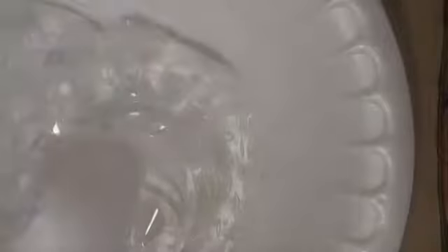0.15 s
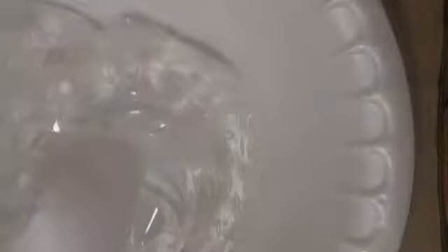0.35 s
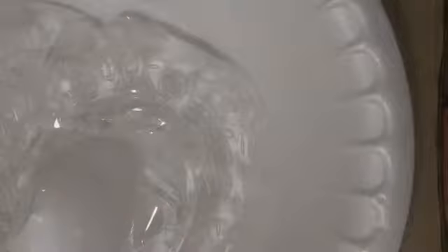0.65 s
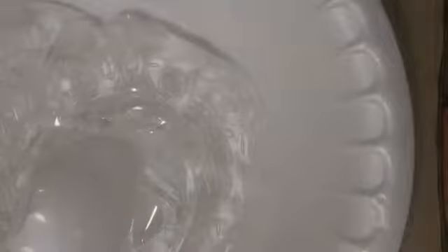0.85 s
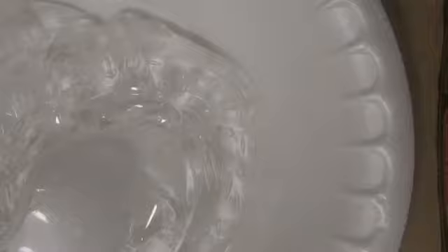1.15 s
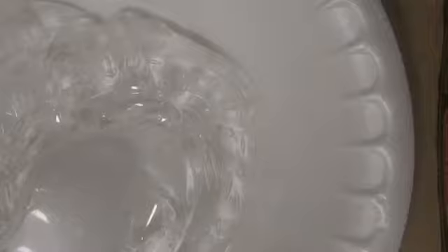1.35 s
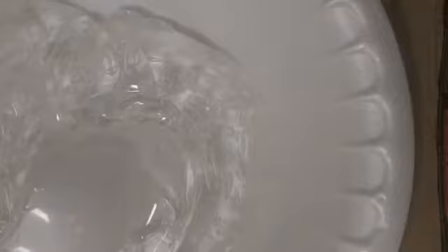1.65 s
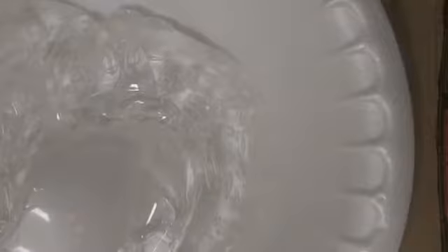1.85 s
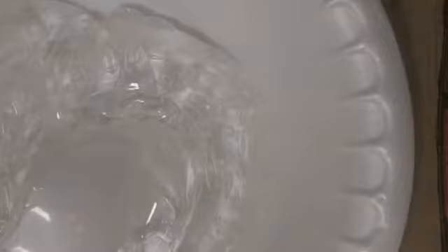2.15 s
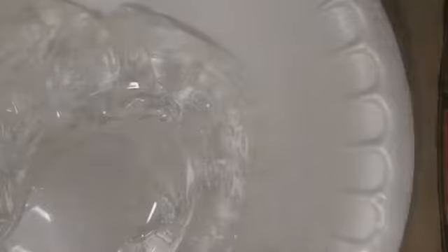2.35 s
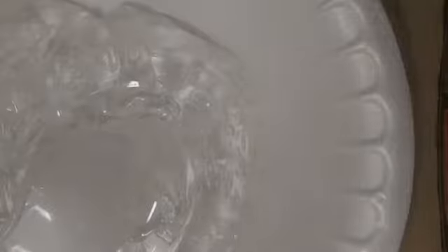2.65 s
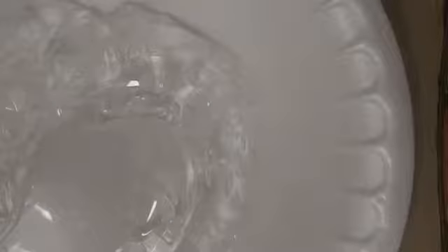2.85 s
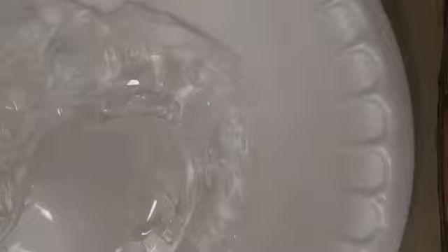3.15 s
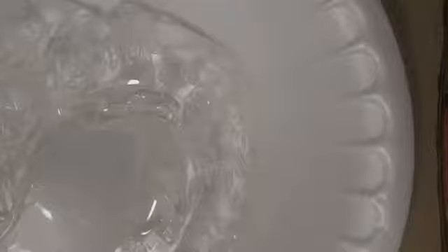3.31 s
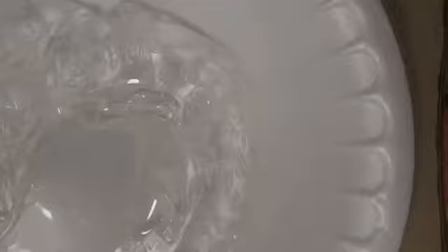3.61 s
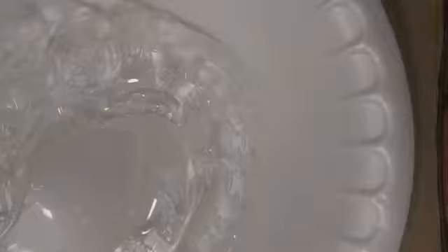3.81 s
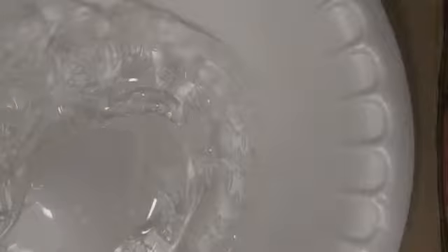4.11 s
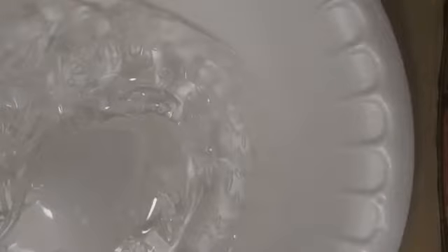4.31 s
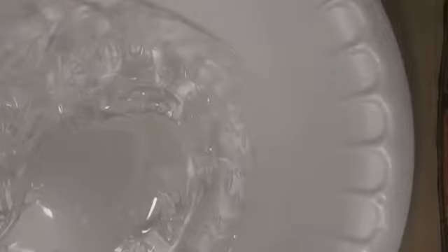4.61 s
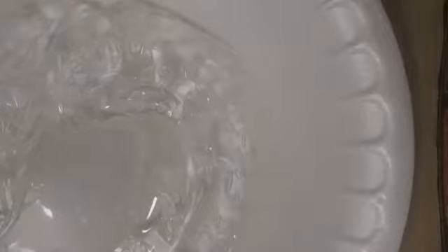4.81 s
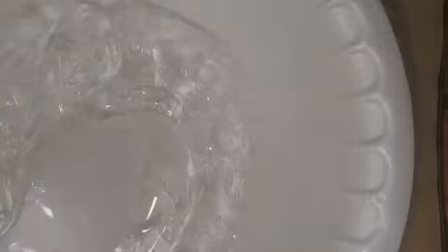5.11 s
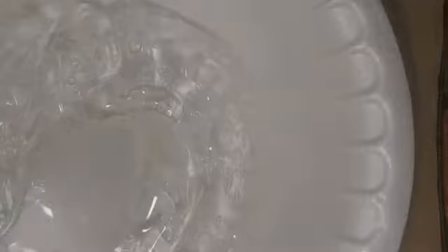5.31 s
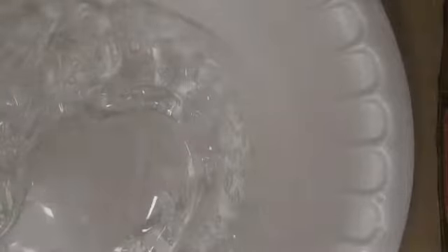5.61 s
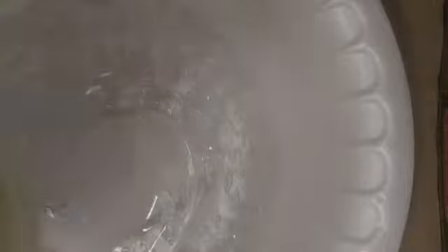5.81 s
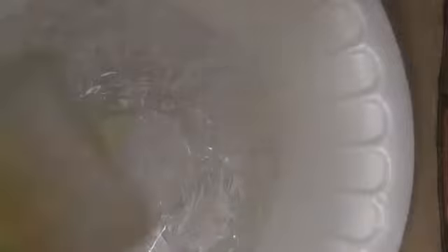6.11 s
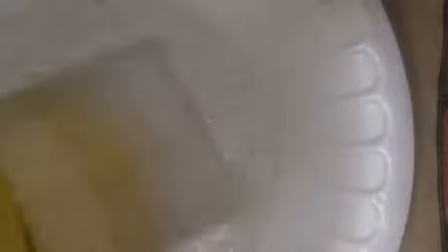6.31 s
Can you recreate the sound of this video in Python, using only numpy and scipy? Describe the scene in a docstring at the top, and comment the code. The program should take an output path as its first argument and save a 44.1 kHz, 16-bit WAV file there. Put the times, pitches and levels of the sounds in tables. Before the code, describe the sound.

A spatula works slowly through thick gel in a plastic cup, with soft smears, sticky crackles and small pops over a fan's hum.

```python
"""A small room, the microphone close to a plastic cup in which a spatula works slowly through thick gloss.
With each push the gel smears with a soft hiss and crackles as sticky threads let go. Early on it
squelches through the gap under the blade, and a few air pockets pop. Now and then the blade brushes
the wall or knocks the cup, which rings briefly. Behind the cup, a fan rushes and hums."""
import sys
import numpy as np
from scipy import signal
from scipy.fft import rfft, irfft
from scipy.io import wavfile
from scipy.ndimage import map_coordinates

SR = 44100
rng = np.random.default_rng(int(sys.argv[2]) if len(sys.argv) > 2 else 0)


def to_wav(sig):
    """Store sig (one row per channel, or 1-D mono) as 16-bit WAV at the path in sys.argv[1].

    Samples outside -1..1 are clipped; the rate is SR.
    """
    pcm = np.clip(np.atleast_2d(sig), -1, 1) * 32767
    pcm = np.round(pcm).astype(np.int16)
    wavfile.write(sys.argv[1], SR, pcm.T)  # frames by channels


N = 284886
TIME = np.arange(N) / SR

# pushes of the blade: (fastest moment [s], swell [s], fade [s], relative level [dB], rasp offset [dB])
PUSHES = [(.03, 0.12, 0.27, -58.5, -6), (.245, 0.35, 0.26, -48.5, -6), (.56, 0.19, 1, -49.5, -4.5),
          (0.712, 0.069, 0.11, -45.5, -8), (.83, 0.056, 0.095, -51, -3), (.874, 0.061, 0.048, -46, -10),
          (.93, .05, 0.082, -56, -4.5), (1.125, 0.21, 0.13, -58.5, 0), (1.257, 0.013, 0.089, -55, 0),
          (1.34, 0.11, 0.29, -55, -7.5), (1.417, 0.023, 0.024, -42, -7), (1.55, 0.18, 0.13, -50, -8),
          (1.64, 0.071, 0.13, -49.5, -9), (1.717, 0.039, 0.043, -44, -8.5), (1.87, 0.25, 0.76, -52.5, -8.5),
          (2.025, 0.05, 0.056, -49, -6), (2.265, 0.11, 0.18, -51.5, 0), (2.41, 0.072, 0.19, -62, -0.5),
          (2.84, 0.19, 0.29, -65, 1.5), (3.037, 0.0099, 0.018, -41, -1.5),
          (3.165, 0.092, 0.17, -61.5, -1.5), (3.355, 0.091, 0.076, -59, 0.5), (3.45, 0.11, 0.12, -58.5, 0),
          (3.57, 0.043, 0.11, -61, -1), (4.26, 0.3, 0.23, -63, -1.5), (4.37, 0.043, 0.055, -62, 1),
          (4.54, 0.16, 0.2, -49, -6), (4.8, 0.17, 0.15, -65.5, -6), (4.96, 0.054, 0.62, -65.5, -0.5),
          (5.146, 0.01, 0.05, -63, -17), (5.372, 0.04, 0.3, -57.5, -6), (5.5, 0.14, 0.25, -64, 0.5)]
# how readily the gel tears: (time [s], share of the smear that is grains [0-1])
TACKINESS = [(0, 0.25), (.5, 0.24), (.72, 0.2), (1.0, 0.18), (1.9, 0.37), (2.25, 0.47), (3.2, 0.2),
             (4.35, 0.7), (4.52, 0.5), (5.4, 0.25), (6.4, 0.3)]
# spectrum of the smear's hiss: (frequency [Hz], relative density [dB])
HISS_SPECTRUM = [(500, -42), (1500, -25), (3000, -48), (6000, -2.5), (8500, 6), (11000, 6.5), (12500, 7.5),
                 (14000, 9)]
# spectrum of the rasp under pressure: (frequency [Hz], relative density [dB])
RASP_SPECTRUM = [(300, -22), (700, 9.5), (1100, 2.5), (1650, -0.5), (2700, 0), (3700, 0), (5200, 1),
                 (7500, 0), (12000, -68)]
# the larger threads snapping: (time [s], relative level [dB], brightness [dB])
THREAD_SNAPS = [(0.684, -40.5, -18), (0.856, -42, -10), (0.869, -46, -6), (0.933, -50, -15),
                (1.3465, -41, -7), (1.417, -35, -26), (1.4222, -33, 4), (2.1811, -40.5, -21),
                (2.2155, -39.5, -21.5), (2.2454, -33.5, -8), (2.2635, -43.5, -18.5), (2.274, -42, -19),
                (2.281, -38.5, -15), (2.3228, -40, -19.5), (2.3319, -40.5, -13), (2.4968, -45, -20),
                (2.508, -45, -21), (2.7892, -46, -20.5), (2.8163, -44.5, -17), (2.9141, -43.5, -17),
                (3.034, -36, -22), (3.041, -44, -12), (3.048, -42, -22), (3.0792, -37.5, -15),
                (3.093, -43, -18), (3.118, -49, -16), (3.1257, -46, -13), (3.153, -46, -20),
                (3.159, -44, -20), (3.165, -38.5, -15), (3.1784, -35.5, -16), (3.206, -40.5, 0),
                (3.2427, -46, -7), (3.3098, -42, -5), (3.3325, -37.5, -10.5), (3.3532, -42, -23),
                (3.358, -45.5, -13), (3.364, -44, -12), (3.459, -39, -18), (3.519, -54, -12),
                (3.558, -43.5, -16), (3.563, -42, -16), (3.5692, -43, -17), (3.577, -45, -13),
                (3.5986, -51, -23), (3.6592, -48, -19), (3.976, -48.5, -19), (3.986, -48.5, -20),
                (4.1782, -47, -18), (4.1844, -45, -21), (4.231, -38, -6), (4.2393, -36.5, -16.5),
                (4.272, -46, -14), (4.276, -43.5, -23), (4.2964, -42.5, -14), (4.3222, -42.5, -19.5),
                (4.3398, -41, -17), (4.347, -40.5, -22.5), (4.3647, -42, -22), (4.371, -43, -22),
                (4.377, -44, -18), (4.3952, -45, -13), (4.429, -47, -19), (4.4422, -40.5, -15),
                (4.587, -38.5, -25), (4.6542, -47.5, -23), (4.9328, -45.5, -16), (5.137, -34, -16.5),
                (5.1713, -51.5, -30), (5.198, -46, -24), (6.417, -52, 8)]
# spectrum of a snap: (frequency [Hz], relative density [dB])
SNAP_SPECTRUM = [(300, -23), (900, -7), (1700, -5.5), (2800, -9.5), (5000, -4), (8500, 4), (11000, 2.5),
                 (14000, 3)]
# the blade peeling off the wall: (start [s], end [s], fine snaps [1/s])
BLADE_PEELS = [(2.198, 2.344, 40), (2.759, 2.86, 20), (3.056, 3.28, 60), (3.315, 3.387, 70),
               (3.459, 3.534, 30), (4.306, 4.5, 70)]
# air pockets opening: (time [s], level [dB], pitch [Hz], t60 [s])
AIR_POCKETS = [(.548, -36, 980, 0.019), (0.552, -42, 1710, 0.03), (.558, -37, 920, 0.038),
               (1.095, -28, 2100, 0.0035), (1.124, -34, 2150, 0.008), (1.1305, -33, 2450, 0.011),
               (1.1375, -34, 2000, 0.008), (1.1415, -31, 2350, 0.0067), (1.148, -34, 2060, 0.0099),
               (1.152, -32, 2370, 0.012), (1.186, -18, 2070, 0.012), (1.193, -24.5, 2070, 0.011),
               (1.1986, -30, 1920, 0.02), (6.345, -47.5, 5330, 0.0094), (6.403, -46.5, 5400, 0.0083)]
# gel squeezed under the blade: (start [s], rise [s], level [dB], fade [dB/s], gap pitch [factor])
GEL_SQUEEZES = [(.17, 0.073, -54.5, 78, 1.08), (0.432, 0.019, -46.5, 120, 1.03),
                (.543, 0.013, -69, 300, 0.49)]
# resonances of the gap under the blade: (base frequency [Hz], width [Hz], gain [dB])
GAP_RESONANCES = [(1244, 106, 7.5), (1534, 200, 8.5), (2680, 270, -2), (3100, 420, -1), (4250, 270, -6),
                  (4700, 270, -0.5), (6860, 350, -4.5), (12370, 260, 5.5), (13100, 800, -1)]
# the blade meeting the cup: (time [s], relative level of the first 10 ms [dB], centre of the blow [Hz],
# contact [s], ring time left by the pressing blade [share], breadth of the blow [octaves])
CUP_KNOCKS = [(0.1416, -45.5, 1710, 0.00081, 0.8, 0.93), (0.1415, -39, 255, 0.0011, 0.71, 0.46),
              (.1485, -49, 1200, 0.002, 0.9, 1), (1.0952, -47.5, 796, 0.0005, 0.2, 1.3),
              (1.411, -47.5, 474, 0.0059, 0.67, 1), (1.417, -47.5, 1490, 0.0019, 0.61, 0.43),
              (1.419, -45, 300, 0.014, 0.56, 0.49), (3.0324, -34.5, 880, 0.0012, 1, 0.5),
              (3.034, -46.5, 1450, 0.002, 1, 0.25), (3.0397, -42, 1000, 0.0012, 0.65, 0.39),
              (3.0403, -39.5, 483, 0.00082, 0.43, 0.38), (3.047, -41.5, 730, 0.0012, 0.56, 0.73),
              (3.067, -55, 750, 0.0017, 0.55, 0.6), (3.076, -51, 850, 0.002, 0.67, 0.41),
              (4.5135, -47.5, 1190, 0.0029, 0.84, 1), (4.589, -45, 1150, 0.01, 0.83, 1.0)]
# modes of the cup: (frequency [Hz], gain [dB], free t60 [s])
CUP_MODES = [(276.4, 11, 0.12), (469, 15, 0.076), (624, 14.5, 0.047), (738, 9, 0.066), (859, 7.5, 0.055),
             (1020, 8.5, 0.052), (1320, 3.5, 0.058), (1456, 5, 0.027), (1930, 0, 0.035), (2450, 5, 0.008)]
# the blade's edge brushing the wall: (time [s], level [dB], fade [s])
EDGE_BRUSHES = [(.683, -50, 0.036), (.712, -47.5, 0.023), (.795, -60, 0.052), (.856, -42, 0.0092),
                (0.872, -45.5, 0.013)]
# resonances of the blade: (base frequency [Hz], width [Hz], gain [dB])
BLADE_RESONANCES = [(2180, 790, -4.5), (3850, 590, 2), (5730, 1200, 0.5), (7500, 1000, -0.5)]
# spectrum of the fan's rush: (frequency [Hz], relative density [dB])
FAN_SPECTRUM = [(20, -41.5), (110, -36.5), (165, -27.5), (205, -14), (255, -9), (330, -6), (480, -4),
                (570, -10.5), (750, -15.5), (1100, -25), (1900, -24.5), (2600, -32.5), (6000, -38),
                (10000, -43.5), (14000, -42.5)]
# resonances and notches of the fan's duct: (frequency [Hz], width [Hz], gain [dB])
DUCT_RESONANCES = [(349, 18, -3), (408.4, 35, 9), (429.3, 7.7, 3), (445.7, 8.5, -1.5), (590, 23, -3.5),
                   (636, 18, 4), (880, 13, 2.5), (1493, 110, 4.5), (3070, 500, 5)]
# tones of the fan's motor: (frequency [Hz], rms level [dB])
MOTOR_TONES = [(360.5, -57), (430.7, -71.5), (1034, -78), (1168, -78.5), (1260, -82), (3106, -80),
               (3623, -83.5), (4140, -88.5)]


def smear(hiss_db=-1.5, rasp_db=-2.5, grains_per_s=1400, spread_db=3.5, judder_db=1.6, grain_s=0.00075):
    """Close up, fine hiss and tiny tearing grains under the blade; pressure brings out a lower rasp."""
    hiss_level, rasp_level = push_levels()
    tack = np.clip(np.interp(TIME, *np.transpose(TACKINESS)), 0, 1)
    sizes = amp(spread_db * np.minimum(rng.exponential(1, N), 4))
    tears = sizes * (rng.random(N) < grains_per_s / SR)
    grains = unit(signal.lfilter([1], [1, -np.exp(-1 / (grain_s * SR))], tears))
    grit = np.sqrt(1 - tack + tack * grains ** 2)  # steady wiping plus separate grains
    hiss = unit(colour(grit * rng.standard_normal(N), lambda hz: spectrum_db(HISS_SPECTRUM, hz)))
    rasp = unit(colour(grit * rng.standard_normal(N), lambda hz: spectrum_db(RASP_SPECTRUM, hz)))
    judder = amp(judder_db * wander(66))
    return judder * (amp(hiss_db) * hiss_level * hiss + amp(rasp_db) * rasp_level * rasp)


def push_levels(drop_db=31, swell_bend=2.02, fade_bend=1.4, creep_db=-69, creep_db_per_s=-1.5):
    """Envelopes of hiss and rasp: each push swells and fades over the slow creep of the settling gel."""
    hiss_power = rasp_power = amp(creep_db + creep_db_per_s * TIME) ** 2
    for s, swell_s, fade_s, db, pressure_db in PUSHES:
        before = np.maximum((s - TIME) / swell_s, 0) ** swell_bend
        after = np.maximum((TIME - s) / fade_s, 0) ** fade_bend
        power = amp(db - drop_db * np.minimum(before + after, 10)) ** 2
        hiss_power = hiss_power + power
        rasp_power = rasp_power + power * amp(pressure_db) ** 2
    return np.sqrt(hiss_power), np.sqrt(rasp_power)


def snaps(gain_db=-4.0, rise_s=0.00073, fizz_s=0.024, strand_db=-11.5, strands_s=0.013,
          neutral_db=-14.0, hollow_hz=1800, hollow_t60=0.048):
    """A thread parts in a sharp burst and blips the hollow behind it; its last strands fizz after."""
    out, t = np.zeros(N), np.arange(2 ** 11) / SR
    fizz = amp(-15) * np.exp(-t / fizz_s)
    def burst(after_s):
        age = np.maximum(t - after_s, 0) / rise_s
        return age * np.exp(1 - age)
    for s, db, bright_db in THREAD_SNAPS + fine_threads():
        tilt_db = bright_db - neutral_db
        def shape(hz):
            octaves = np.clip(np.log2((hz + 1) / 6000), -1, 1)
            return spectrum_db(SNAP_SPECTRUM, hz) + 0.96 * tilt_db * octaves
        strands = sum(burst(strands_s * late) ** 2 for late in rng.random(size=2))
        level = np.sqrt((burst(0) + fizz) ** 2 + amp(strand_db) ** 2 * strands)
        crack = level * unit(colour(rng.standard_normal(len(t)), shape))
        hollow_db = -14 - 0.21 * tilt_db  # thick, dull threads open larger hollows
        hollow = resonate(rng.standard_normal(len(t)), hollow_hz * rng.uniform(0.84, 1.05), width_hz=800)
        blip = amp(hollow_db - 60 * t / hollow_t60) * unit(hollow)
        add(out, s, amp(db + gain_db) * (crack + blip))
    return out


def fine_threads():
    """Fine threads let go at random in each peel: (time [s], relative level [dB], brightness [dB])."""
    rows = []
    for start, end, per_s in BLADE_PEELS:
        count = round((end - start) * per_s)
        for when, softness, tone in rng.random(size=(40, 3))[:count]:
            rows.append((start + (end - start) * when, -51.5 - 2 * softness, -25 + 10 * tone))
    return rows


def pops(rise_s=0.0018, sag=0.02, wobble=0.046, spit_db=-9.5, spit_s=0.003, spit_octaves=0.32,
         spray_db=-31.0, spray_hz=5700, spray_s=0.005):
    """Air pockets open with a spit and a faint spray, then ring briefly, wobbling with their soft walls."""
    out, t = np.zeros(N), np.arange(2 ** 11) / SR
    for s, db, hz, t60 in AIR_POCKETS:
        pitch_hz = hz * (1 - sag * np.minimum(t / t60, 1) + wobble * wander(500, len(t)))
        ring = amp(-60 * t / t60) * np.sin(2 * np.pi * np.cumsum(pitch_hz) / SR)
        def shape(f):  # falls off steeply above the pocket's pitch, more gently below
            offset = np.log2((f + 1) / hz) / spit_octaves
            return -10 * np.log10(1 + np.maximum(2 * offset, 0) ** 4 + offset ** 4)
        spit = amp(spit_db) * np.exp(-t / spit_s) * unit(colour(rng.standard_normal(len(t)), shape))
        mist = unit(resonate(rng.standard_normal(len(t)), spray_hz, spray_hz / 2))
        spray = amp(spray_db) * np.exp(-t / spray_s) * mist
        opening = 1 - np.exp(-(t / rise_s) ** 2)
        add(out, s, amp(db) * opening * (ring + spit + spray))
    return out


def squelch(sink_per_s=0.42, length_s=0.36, flutter=0.02, judder_db=2.7, sputter_db=0.5):
    """Air and gel sputter through a narrow gap whose resonances sink as it widens."""
    out, t = np.zeros(N), np.arange(2 ** 14) / SR
    for s, rise_s, db, fade_db_per_s, pitch in GEL_SQUEEZES:
        flow = rng.standard_normal(len(t))
        glide = pitch * (1 - sink_per_s * t + flutter * wander(40, len(t)))
        flow *= amp(sputter_db * wander(300, len(t)))
        voice = sum(amp(gain) * resonate(flow, hz * glide, width) for hz, width, gain in GAP_RESONANCES)
        level = np.minimum(t / rise_s, 1) * amp(db - fade_db_per_s * np.maximum(t - rise_s, 0))
        ending = np.exp(-(t / length_s) ** 10)
        add(out, s, level * ending * unit(voice))
    return out * amp(-judder_db * wander(120))


def knocks(chatter=0.099, band_hz=(200, 4000)):
    """A push cushioned by gel and a short chatter ring the cup; a soft blow reaches only its low modes."""
    out, t = np.zeros(N), np.arange(2 ** 13) / SR
    for s, db, centre_hz, contact_s, ring_share, width_octaves in CUP_KNOCKS:
        blow = chatter * rng.standard_normal(len(t)) * np.exp(-t / contact_s)
        blow[0] += 1
        ring = np.zeros(len(t))
        for hz, mode_db, t60 in CUP_MODES:
            response = amp(-60 * t / (t60 * ring_share)) * np.cos(2 * np.pi * hz * t)
            mode = signal.fftconvolve(blow, response)[:len(t)]
            reach = np.exp(-(np.log2(hz / centre_hz) / width_octaves) ** 2 / 2)
            sign = rng.choice([-1, 1])  # depends on where the blade lands
            ring += sign * amp(mode_db) * reach * unit(mode)
        ring *= 1 - np.exp(-(t * centre_hz) ** 2)  # the blow builds up over about one cycle
        add(out, s, amp(db) * ring / np.std(ring[t < .01]))
    # a small cup radiates almost no bass, and the gel cushions the treble
    return signal.sosfilt(signal.butter(3, band_hz, "bandpass", fs=SR, output="sos"), out)


def brushes(rise_s=0.0024, pitch_spread=0.042, flutter=0.02, judder_db=3.0):
    """The blade's edge bites, then skids off the wall; its resonances waver as it flexes."""
    out, t = np.zeros(N), np.arange(2 ** 13) / SR
    for s, db, fade_s in EDGE_BRUSHES:
        rub = rng.standard_normal(len(t)) * amp(judder_db * wander(250, len(t)))
        flex = 1 + pitch_spread * rng.uniform(-0.61, 1) + flutter * wander(50, len(t))
        voice = sum(amp(gain) * resonate(rub, hz * flex, width) for hz, width, gain in BLADE_RESONANCES)
        add(out, s, amp(db) * np.minimum(t / rise_s, 1) * np.exp(-t / fade_s) * unit(voice))
    return out


def cup_wall(x, echo_gain=0.2, delay_s=0.000561, travel=0.305):
    """A close reflection off the cup wall, whose path changes as the blade moves, ripples the treble."""
    echo_time = TIME - delay_s * np.exp(travel * wander(4.3))
    return x + echo_gain * map_coordinates(x, [echo_time * SR], order=3)


def room(x, wet_db=-10.0, t60=0.12, shift_hz=1.762, echoes_per_s=3000):
    """Weak, short reflections from the table and the walls, shifting as the blade moves."""
    t, wet = np.arange(SR // 3) / SR, np.zeros(N)
    for place in np.arange(3) / 3:
        echoes = rng.standard_normal(len(t)) * (rng.random(len(t)) < echoes_per_s / SR)
        echoes *= (t > .002) * amp(-60 * t / t60)
        share = np.sqrt(2 / 3) * np.cos(np.pi * (shift_hz * TIME + place))
        wet += signal.fftconvolve(x * share, echoes / np.linalg.norm(echoes))[:N]
    return x + amp(wet_db) * wet


def fan(rush_db=-51.5, drone_hz=520, throb_db=1.12, ease_db=1.0, waver_db=1.53, drift_hz=0.64):
    """In the background, air rushes through a resonant housing over slightly wavering motor tones."""
    def shape(hz):
        duct_db = sum(db * 2 ** (-2 * ((hz - f) / width) ** 2) for f, width, db in DUCT_RESONANCES)
        return spectrum_db(FAN_SPECTRUM, hz) + duct_db
    rush = amp(rush_db) * unit(colour(rng.standard_normal(N), shape))
    drone = colour(rush, lambda hz: -10 * np.log10(1 + (hz / drone_hz) ** 8))
    # the low drone throbs with the turbulence and eases a little over time; the hiss above stays even
    swell = amp(throb_db * wander(14) + ease_db * np.linspace(.5, -.5, N))
    hum = np.zeros(N)
    for hz, db in MOTOR_TONES:
        peak = np.sqrt(2) * amp(db + waver_db * wander(22))
        hum += peak * np.sin(2 * np.pi * np.cumsum(hz + drift_hz * wander(4.1)) / SR)
    return rush + drone * (swell - 1) + hum


def amp(db):
    """Decibels to gain."""
    return 10 ** (np.asarray(db) / 20)


def unit(x):
    """Scales to rms 1."""
    return x / np.sqrt(np.mean(x ** 2) + 1e-20)


def spectrum_db(points, hz):
    """Reads a spectrum table, joined on a log-frequency axis."""
    f, db = np.transpose(points)
    return np.interp(np.log(hz + 1), np.log(f), db)


def colour(x, gain_db):
    """Filters x by a function from Hz to dB."""
    return irfft(rfft(x) * amp(gain_db(np.fft.rfftfreq(len(x), 1 / SR))), len(x))


def wander(top_hz, size=N):
    """Random drift of rms 1, no faster than top_hz."""
    slow = np.fft.rfftfreq(size, 1 / SR) < top_hz
    return unit(irfft(rfft(rng.standard_normal(size)) * slow, size))


def add(mix, s, sound):
    """Mixes a sound in at time s."""
    part = mix[max(round(s * SR), 0):][:len(sound)]
    part += sound[:len(part)]


def resonate(x, hz, width_hz):
    """A steep resonance of gain 1 at hz, a steady pitch or a curve."""
    turn = np.exp(2j * np.pi * np.cumsum(np.broadcast_to(hz, len(x))) / SR)
    pole = np.exp(-np.pi * width_hz / SR)
    return 2 * (turn * signal.lfilter([(1 - pole) ** 2], [1, -2 * pole, pole ** 2], x / turn)).real


def scene():
    """One microphone: the cup close by, the fan behind it."""
    gel = cup_wall(smear() + snaps())
    cup = gel + brushes() + knocks() + pops() + squelch()
    return (room(cup) + fan())[None]


def record(dry, edge_hz=13980):
    """The recorder's band limit."""
    lowpass = signal.firwin(301, edge_hz, window=("kaiser", 8), fs=SR)
    return signal.oaconvolve(dry, lowpass[None], "same")


dry = scene()
out = record(dry)
to_wav(out)
```